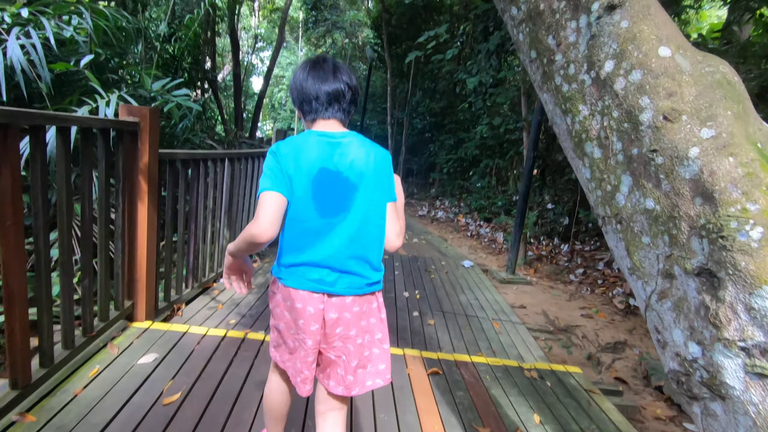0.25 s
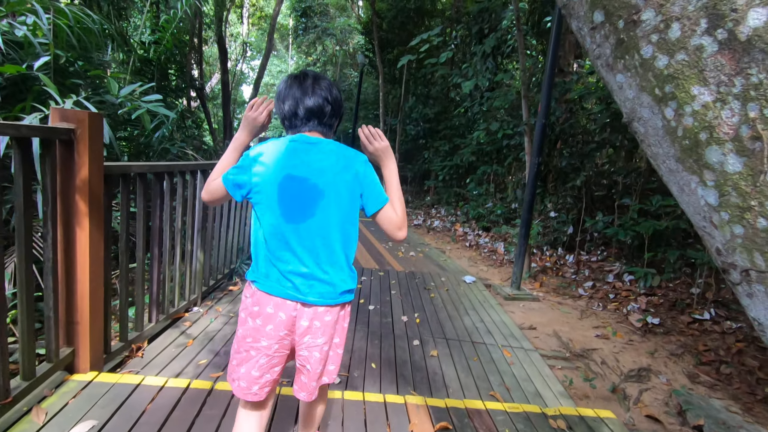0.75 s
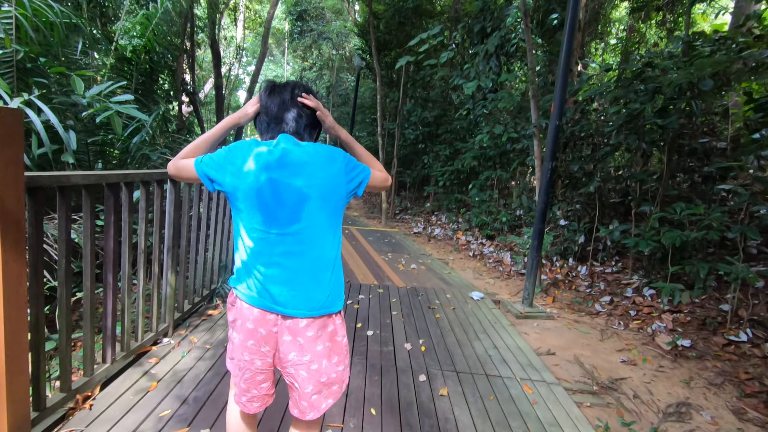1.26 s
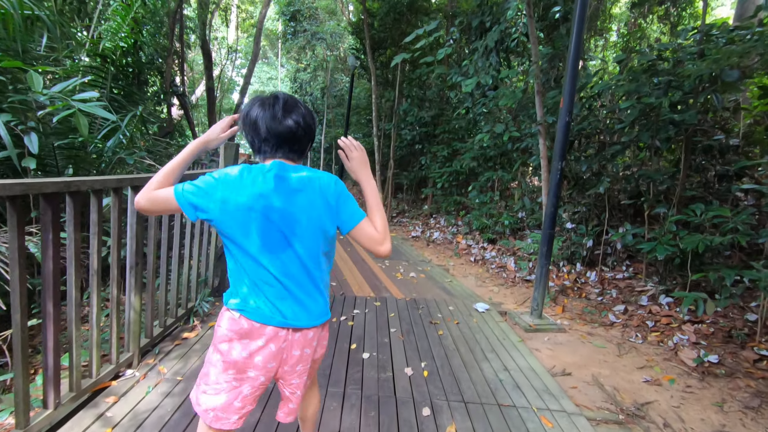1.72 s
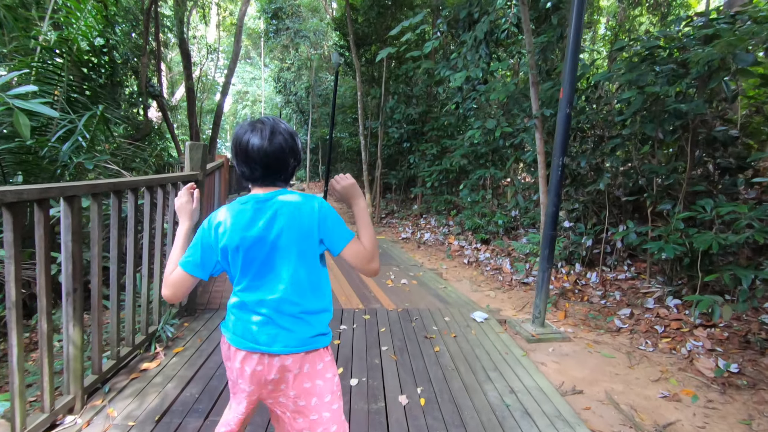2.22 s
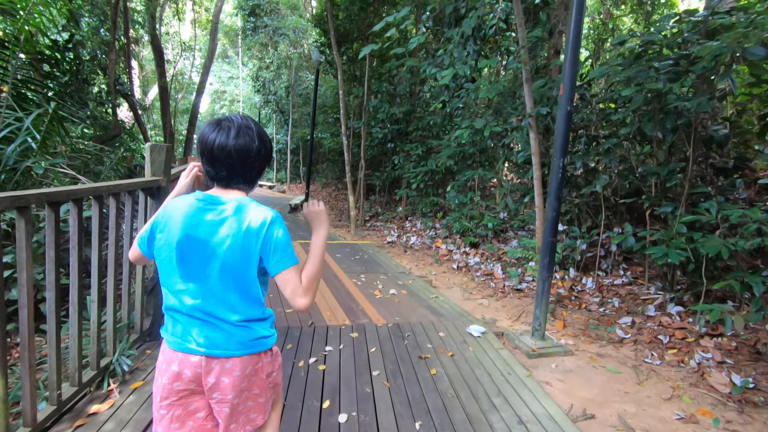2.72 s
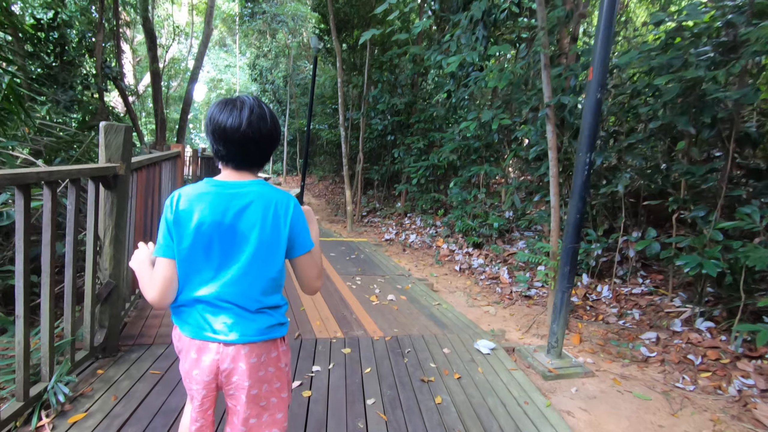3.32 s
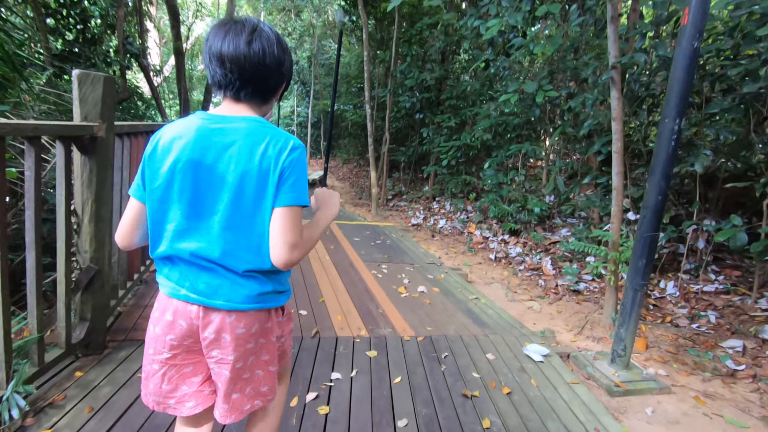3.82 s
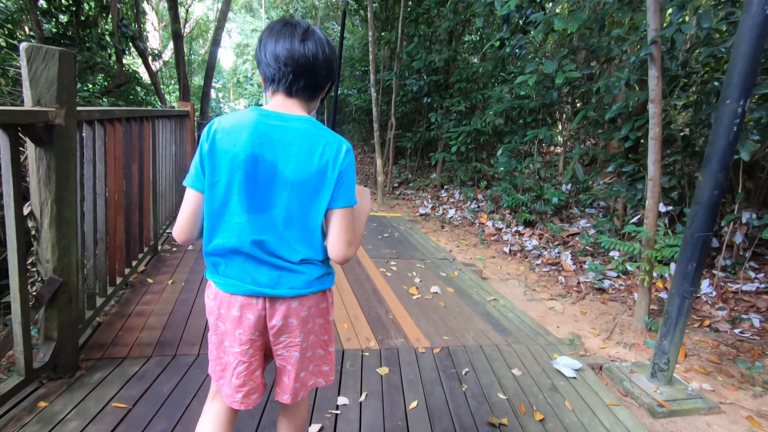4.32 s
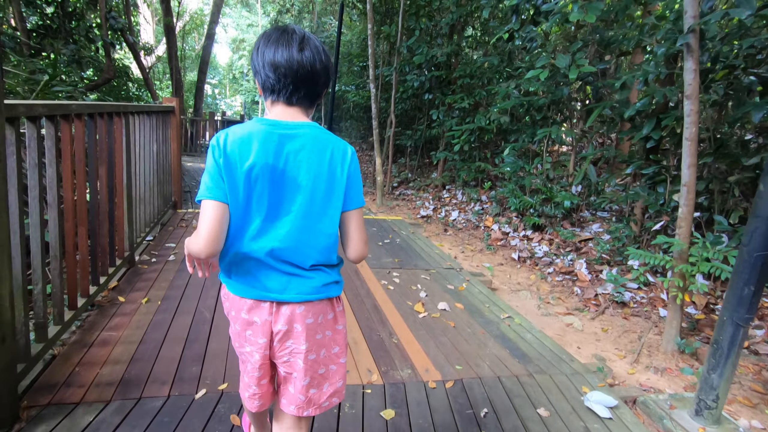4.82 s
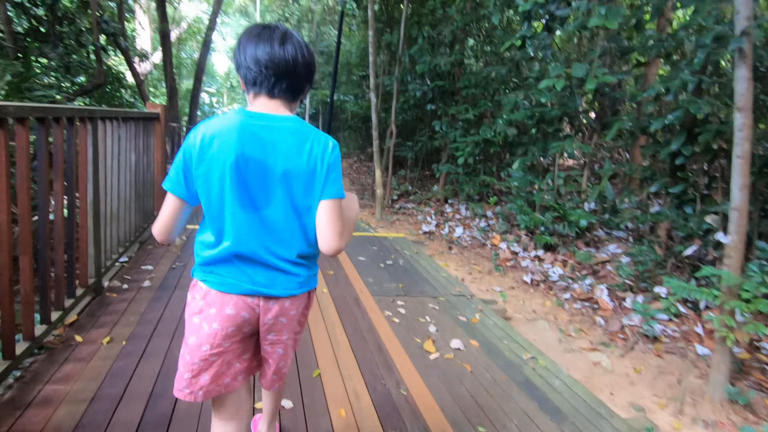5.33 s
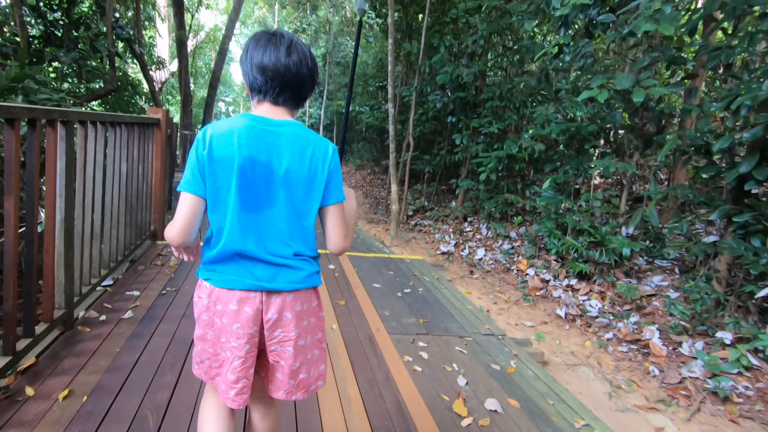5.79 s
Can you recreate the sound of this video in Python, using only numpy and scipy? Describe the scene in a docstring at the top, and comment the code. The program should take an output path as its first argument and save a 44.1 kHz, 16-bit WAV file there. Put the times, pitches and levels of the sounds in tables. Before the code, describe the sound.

Running steps knock rattling wooden boards, soften to lighter slaps, then knock hard again, under a steady piercing insect whine and deep hum.

```python
"""Boardwalk through a tropical forest

Shoes slap on firm boards, as short bursts of filtered noise. Loose planks add fading wood tones: they thud,
ring and clack back, and the deck rumbles on. Grit snaps underfoot, and hard jolts clack close by.
A near cicada, built from sine tones, repeats a falling whine over a noise chorus, a low drone and wind.
A gain control turns the sound down, the treble most of all, while the low knocks are loud."""
import sys
import numpy as np
from scipy import signal
from scipy.fft import rfft, irfft, next_fast_len
from scipy.io import wavfile
from scipy.ndimage import uniform_filter1d

SR = 44100
rng = np.random.default_rng(int(sys.argv[2]) if len(sys.argv) > 2 else 0)


def wav_out(sig):
    """Save sig, one row per channel (or a flat mono array), as 16-bit PCM at SR to the path in sys.argv[1]."""
    wavfile.write(sys.argv[1], SR, np.round(np.clip(np.atleast_2d(sig).T, -1, 1) * 32767).astype(np.int16))


N = 267069
TIME = np.arange(N) / SR
LEAD_S = .03  # room before each blow for the sound to swell
BLOW_TIME = np.arange(16384) / SR - LEAD_S  # seconds, zero at the blow

# loose planks trodden down, then falling back: [t/s, clack level/dB, deck thud level/dB,
# plank ring level/dB, delay of the fall/s, fall relative to tread/dB]
TREADS = [(0.003, -23, -23, -24, 0.026, -3), (0.119, -19, -16, -22, 0.051, 4.5),
          (0.286, -24, -21.5, -23.5, 0.038, 5), (0.406, -30, -28.5, -27.5, 0.035, 6.5),
          (0.455, -17, -24.5, -20.5, 0.048, -5.5), (0.554, -30, -30.5, -20.5, .046, 3),
          (0.619, -34, -36, -18.5, 0.067, -2.5), (5.305, -24, -30, -14.5, 0.027, -2),
          (5.319, -14.5, -13.5, -12, .055, 1.5), (5.545, -20.5, -15.5, -16, .053, 5.5),
          (5.709, -19, -18, -23.5, .036, 1.5), (5.823, -27, -23, -29.5, 0.056, -14.5),
          (5.914, -31, -28, -21.5, 0.04, -3), (6.011, -27.5, -28.5, -28.5, .035, -28)]
# hard jolts close by: [t/s, clack level/dB]
JOLTS = [(3.702, -36.5), (3.716, -25), (3.741, -22.5), (3.789, -27), (3.795, -23), (3.818, -33),
         (3.885, -34)]
# colour of a board's dull body sound: [f/Hz, level/dB]
BOARD_COLOUR = [(60, -16.5), (200, -4), (380, -6), (600, -19), (2000, -54)]
# colour of grit scraped on wood: [f/Hz, level/dB]
GRIT_COLOUR = [(800, -20), (2200, -3), (4700, 0), (6200, -6), (8500, -7), (9800, -22), (15000, -50)]
# colour of low rumble, in the wind and in the deck: [f/Hz, level/dB]
RUMBLE_COLOUR = [(15, -20), (33, -3.5), (72, -5.5), (100, -2.5), (130, -13.5), (180, -17), (300, -21),
                 (1500, -90)]
# colour of the forest's wash, also used for chattering boards: [f/Hz, level/dB]
FOREST_COLOUR = [(100, 8), (185, 16.5), (280, 12), (560, 3.5), (800, -4.5), (1500, -5), (3500, -29.5),
                 (7000, -30.5), (8500, -25), (10000, -28), (14000, -37)]


def gain_of(db):
    """Turns decibels into a factor on the sound wave."""
    return 10 ** (np.asarray(db) / 20)


def evened(x):
    """Scales to an rms of one."""
    return x / np.sqrt(np.mean(x ** 2) + 1e-20)


def read(points, hz):
    """Reads a spectrum in dB at the given frequencies, along a logarithmic frequency scale."""
    f, db = np.transpose(points)
    return np.interp(np.log(hz + 1), np.log(f), db)


def add(mix, s, sound):
    """Mixes a sound in at time s, cutting off what lies outside the scene."""
    start = round(s * SR)
    sound = sound[max(-start, 0):]
    part = mix[max(start, 0):][:len(sound)]
    part += sound[:len(part)]


def wander(rate_hz):
    """Slow random drift with an rms of one: noise with its fast changes filtered away."""
    size = next_fast_len(N)
    hz = np.fft.rfftfreq(size, 1 / SR)
    slow = rfft(rng.standard_normal(size)) * np.exp(-(hz / rate_hz) ** 2)
    return evened(irfft(slow, size)[:N])


def noise(points, patchy_db):
    """Coloured noise whose level drifts in patches of time and frequency."""
    hz = np.fft.rfftfreq(2048, 1 / SR)
    a, b, patches = rng.standard_normal((3, len(hz), N // 512 + 5))
    patches = uniform_filter1d(patches, size=12, axis=0)
    patches = evened(uniform_filter1d(patches, size=4, axis=1))
    level_db = read(points, hz)[:, None] + patchy_db * patches
    z = (a + 1j * b) * gain_of(level_db)
    return evened(signal.istft(z, nperseg=2048, noverlap=1536)[1][:N])


def colour(x, points):
    """Filters with the given spectrum, so that nothing sounds before its cause."""
    size = 2 * len(x)
    log_gain = np.log(gain_of(read(points, abs(np.fft.fftfreq(size, 1 / SR)))))
    response = np.exp(np.conj(signal.hilbert(log_gain)))
    return np.fft.ifft(np.fft.fft(x, size) * response).real[:len(x)]


def sized(x, db, window):
    """Sets the rms level of a sound's loudest window (s)."""
    loudest = uniform_filter1d(x ** 2, max(int(window * SR), 1)).max()
    return x * gain_of(db) / np.sqrt(loudest + 1e-20)


def contact(length, rise, snap, tail_db, tail_t60):
    """A sole brushes the wood, lands with a snap and chatters to rest; the deck scatters the sound."""
    after = np.maximum(BLOW_TIME, 0)
    swell = np.exp(np.minimum(BLOW_TIME, 0) / rise)
    fade = np.exp(-after / max(length, .001)) + gain_of(tail_db - 60 * after / tail_t60)
    # about a quarter of the samples carry a tiny random hit
    hits = rng.standard_normal(len(after)) * (rng.random(len(after)) < .25)
    force = swell * fade * hits
    force /= np.linalg.norm(force)
    force[round(LEAD_S * SR)] += snap
    return force


def woody(x):
    """The boards' short resonances lift several bands, narrow and broad, and weaken one near 1060 Hz."""
    # resonances shared by all boards: [f/Hz, width/Hz, lift/dB]
    resonances = [(556, 77, 5), (700, 53, 2), (792, 8.4, 5.5), (1060, 250, -4), (1616, 69, 4),
                  (2320, 1100, 3)]
    hz = np.fft.rfftfreq(len(x), 1 / SR)
    lift = sum((gain_of(db) - 1) / (1 + 2j * (hz - centre) / width) for centre, width, db in resonances)
    return irfft(rfft(x) * (1 + lift), len(x))


def ring(modes, detune, rise):
    """Wood vibrates at several pitches that swell and die; each blow is tuned a little differently."""
    t = np.maximum(BLOW_TIME, 0)
    tunings = 1 + detune * rng.standard_normal(len(modes))
    waves = 0
    for (hz, db, t60), tuning in zip(modes, tunings):
        waves = waves + gain_of(db - 60 * t / t60) * np.sin(2 * np.pi * hz * tuning * t)
    return waves * (1 - np.exp(-t / rise))


def fading(blows, t60):
    """The level left by blows (s, dB): their energies add up and die away."""
    energy = 0
    for s, db in blows:
        left_db = db - 60 * np.maximum(TIME - s, 0) / t60
        energy = energy + (TIME > s) * gain_of(left_db) ** 2
    return np.sqrt(energy)


def surroundings():
    """Wind rumble and forest wash are drifting noise; the low drone is sine tones that waver."""
    # tones of the drone: [f/Hz, rms level/dB]
    drone_tones = [(36.5, -46), (73, -40), (108.5, -37), (183, -51)]
    wind = gain_of(-36) * noise(RUMBLE_COLOUR, patchy_db=3.5)
    forest = gain_of(-44) * noise(FOREST_COLOUR, patchy_db=5.0)
    drone = 0
    for hz, db in drone_tones:
        strength = gain_of(db) * (1 + 0.061 * wander(4.2))
        turns = np.cumsum(hz + 2.466 * wander(5.75)) / SR
        drone = drone + strength * np.sin(2 * np.pi * turns)
    return wind + forest + np.sqrt(2) * drone


def chorus():
    """Many far cicadas blur into bands of noise at the whine and its overtones."""
    # colour of the chorus: [f/Hz, level/dB]
    chorus_colour = [(2300, -18.5), (2800, -10.5), (3000, 2.5), (3120, 2.5), (3450, -12.5), (4000, -21.5),
                     (5400, -27), (5850, -12.5), (6200, -11), (6700, -27.5), (8400, -27), (8950, -24),
                     (9700, -42)]
    return gain_of(-43.5) * noise(chorus_colour, patchy_db=2.0)


def phrase():
    """Time since the near cicada's phrase began (s), and its swell as a gain."""
    # strength of the phrases, one after another: [level/dB]
    phrase_levels = [-7.5, 0.5, 1, -0.5, -1, -3, -14]
    # swell of one phrase: [t since its start/s, level/dB]
    swell_points = [(0, -14.5), (.36, -15.5), (.48, -2), (.93, -.5), (1, -14)]
    start_s, period_s = .69, .994  # the second phrase starts here; the first is already under way
    number, age = np.divmod(TIME - start_s, period_s)
    db = np.array(phrase_levels)[number.astype(int) + 1] + np.interp(age, *np.transpose(swell_points))
    return age, uniform_filter1d(gain_of(db), size=400)


def sizzle():
    """The chorus's highest band: wide stereo noise that swells with each near phrase."""
    # colour of the sizzle: [f/Hz, level/dB]
    sizzle_colour = [(10000, -41.5), (11200, -35), (11700, -9.5), (12050, -4.5), (12500, -17.5),
                     (13000, -23.5), (13800, -56), (15000, -44), (16000, -61)]
    likeness = 0.25  # of the two ears: 0 unrelated, 1 the same
    right, other = (noise(sizzle_colour, patchy_db=3.5) for _ in range(2))
    left = likeness * right + np.sqrt(1 - likeness ** 2) * other
    swell = 1 + 0.53 * phrase()[1]
    return gain_of(-51) * swell * np.array([left, right])


def near_cicada():
    """A whine that sags through each phrase, with sidebands from the buzzing tymbals (drum skins)."""
    # partials: [multiple of the whine, tymbal sideband number, level before the phrase swell/dB]
    partials = [(1, 0, -46), (2, 0, -44.5), (2, -1, -58), (2, -2, -69), (3, 0, -63), (3, -1, -67),
                (4, 0, -47)]
    whine_hz, sag_hz_per_s, tymbal_hz = 3034, 117, 352
    age, swell = phrase()
    turns = np.cumsum(whine_hz - sag_hz_per_s * age + 2 * wander(90)) / SR
    # a faint twin rises as the top partial falls
    twin_gain = gain_of(-54 + 3 * wander(14))
    out = twin_gain * np.sin(2 * np.pi * (24000 * TIME - 4 * turns))
    for multiple, sideband, db in partials:
        # paths through the leaves fade each partial separately
        flutter = gain_of(1.5 * wander(6)) * np.tanh(abs(1 + .55 * wander(20)))
        tone = np.sin(2 * np.pi * (multiple * turns + sideband * tymbal_hz * TIME))
        out += gain_of(db) * evened(flutter * tone)
    return swell * out


def snaps():
    """Grit and dry leaves crack under a sole: very short, bright bursts."""
    # sharp snaps: [t/s, level/dB]
    snap_times = [(0.087, -31), (2.537, -44), (2.5727, -43), (3.704, -25.5), (5.3177, -25.5),
                  (5.5396, -32.5)]
    # colour of a snap: [f/Hz, level/dB]
    snap_colour = [(1500, -7.5), (5200, -4.5), (7000, -12), (12000, -20), (15500, -44)]
    out = np.zeros(N)
    for s, db in snap_times:
        force = contact(length=0.0014, rise=0.00047, snap=0.24, tail_db=-13, tail_t60=0.14)
        add(out, s - LEAD_S, sized(colour(force, snap_colour), db, window=0.0028))
    return out


def boom_level(s):
    """The boom of a jolt at time s, in dB: each is weaker than the one before."""
    first_db, fall_db_per_s = -17, 97
    return first_db - fall_db_per_s * (s - JOLTS[0][0])


def jolts():
    """Hard clacks that differ between the ears, over a short central boom."""
    # colour of the clack: [f/Hz, level/dB]
    jolt_clack_colour = [(250, 1), (500, 1.5), (900, 6), (1300, -4), (2100, 0), (2800, -16.5), (5000, -21),
                         (9000, -62), (15000, -80)]
    # colour of the boom: [f/Hz, level/dB]
    boom_colour = [(30, -6.5), (115, 6), (170, -8.5), (310, 5.5), (500, -19), (1200, -63)]
    spread = .6  # share of the side sound, added left and subtracted right
    out = np.zeros((2, N))
    for s, clack_db in JOLTS:
        forces = [contact(length=0.0079, rise=0.0015, snap=0.63, tail_db=-18.5, tail_t60=0.38)
                  for _ in range(2)]
        centre, side = (sized(colour(force, jolt_clack_colour), clack_db, window=0.0053)
                        for force in forces)
        boom_force = contact(length=0.072, rise=0.002, snap=0.35, tail_db=-26, tail_t60=0.28)
        boom = sized(colour(boom_force, boom_colour), boom_level(s), window=0.0038)
        for ear, sign in zip(out, (1, -1)):
            add(ear, s - LEAD_S, boom + centre + sign * spread * side)
    return out


def shaken_deck():
    """Heavy blows leave the boardwalk rumbling and its boards chattering, as fading noise."""
    thuds = [(s, thud_db) for s, _, thud_db, *_ in TREADS]
    booms = [(s, boom_level(s)) for s, _ in JOLTS]
    # levels are relative to the thud or boom
    tread_rumble = gain_of(-8) * fading(thuds, t60=1.07)
    jolt_rumble = gain_of(-8) * fading(booms, t60=2.0)
    chatter = gain_of(-17.5) * fading(thuds, t60=0.86)
    rumble_noise = noise(RUMBLE_COLOUR, patchy_db=2.0)
    return (tread_rumble + jolt_rumble) * rumble_noise + chatter * noise(FOREST_COLOUR, patchy_db=6.5)


def knock(clack_db, thud_db, ring_db, rise_s, rattle_s):
    """A loose plank clacks on its joist, rings, and shakes the deck."""
    # the deck on its joists: [f/Hz, level/dB, t60/s]
    deck_modes = [(38, 2, 0.087), (72.6, -37, 0.6), (120.1, 0, 0.1), (160, -16, 0.12)]
    # a single loose plank: [f/Hz, level/dB, t60/s]
    plank_modes = [(200, -17, 0.053), (247.4, 2.5, 0.17), (271.1, 1.5, 0.28), (317.1, -6, 0.41),
                   (354, -8.5, 0.092), (444.7, -10.5, 0.092)]
    # colour of the clack: [f/Hz, level/dB]
    clack_colour = [(150, -11), (420, 2.5), (700, -2), (1050, 1.5), (1400, -14), (2300, -12.5), (3200, -18),
                    (14000, -95)]
    force = contact(rattle_s, rise=rise_s, snap=0.52, tail_db=-15, tail_t60=0.58)
    clack = sized(colour(woody(force), clack_colour), clack_db, window=0.0028)
    body = sized(colour(force, BOARD_COLOUR), clack_db - 3.5, window=0.014)
    grit = sized(colour(force, GRIT_COLOUR), clack_db - 15.5, window=0.0021)
    thud = sized(ring(deck_modes, detune=0.14, rise=0.0019), thud_db, window=.02)
    plank = sized(ring(plank_modes, detune=0.026, rise=0.0051), ring_db, window=0.023)
    return clack + body + grit + thud + plank


def loose_planks():
    """Each loose plank knocks twice: heavily under the foot, then brightly as it falls back."""
    out = np.zeros(N)
    for s, clack_db, thud_db, ring_db, delay, fall_db in TREADS:
        # the foot presses slowly
        tread = knock(clack_db, thud_db, ring_db, rise_s=0.0078, rattle_s=0.0074)
        add(out, s - LEAD_S, tread)
        # the fall is sudden; without the foot the plank chatters longer but moves less wood
        fall = knock(clack_db, thud_db - 15, ring_db - 4, rise_s=0.0036, rattle_s=0.016)
        add(out, s + delay - LEAD_S, gain_of(fall_db) * fall)
    return out


def footsteps():
    """Shoes slap on boards that sit firmly: a woody slap, a gritty scuff and the board's dull body."""
    # shoes on firm boards: [t/s, slap level/dB, grit level/dB]
    steps = [(1.226, -33.5, -49), (1.27, -18.5, -39), (1.715, -40, -46), (1.918, -31, -62),
             (1.95, -16, -39), (1.969, -19, -42), (2.06, -37.5, -44), (2.477, -21, -56),
             (3.067, -36.5, -53), (3.636, -28.5, -64), (4.145, -41.5, -47), (4.725, -38, -44),
             (4.984, -27, -51), (5.456, -26, -44)]
    # colour of the slap: [f/Hz, level/dB]
    slap_colour = [(150, 6), (400, -8.5), (620, 3.5), (1200, 0.5), (1700, -8), (2400, -7.5), (5000, -19.5),
                   (14000, -86)]
    out = np.zeros(N)
    for s, slap_db, grit_db in steps:
        slap_force = contact(length=0.0073, rise=0.0029, snap=0.48, tail_db=-12.5, tail_t60=0.26)
        slap = sized(colour(woody(slap_force), slap_colour), slap_db, window=0.0026)
        scuff_force = contact(length=0.0098, rise=0.0013, snap=0.44, tail_db=-24, tail_t60=.25)
        scuff = sized(colour(scuff_force, GRIT_COLOUR), grit_db, window=0.0034)
        body_force = contact(length=0.03, rise=0.003, snap=0.41, tail_db=-20.0, tail_t60=1.0)
        body = sized(colour(body_force, BOARD_COLOUR), slap_db - 7, window=0.0094)
        add(out, s - LEAD_S, slap + scuff + body)
    return out


def scene():
    """Deck and forest in the centre; the jolts and the sizzle spread between the ears."""
    deck = footsteps() + loose_planks() + shaken_deck() + snaps()
    forest = surroundings() + near_cicada() + chorus()
    return deck + forest + jolts() + sizzle()


def gain_control(x):
    """Loud low knocks slowly turn the sound down, the treble most; it recovers in the pauses."""
    # the deepest cut: [f/Hz, gain/dB]
    deepest_cut = [(100, -1), (1000, -1.5), (3000, -9), (4600, -5), (5900, -11), (7000, -5), (9000, -3.5),
                   (11500, -24.5), (15000, -43)]
    low_hz, high_hz = 200, 420  # the control listens to this band
    threshold_db, knee_db = -31.5, 2.5
    duck_s, recover_s, lag_s = 0.19, 0.44, 0.13
    hz, t, z = signal.stft(x, SR, nperseg=1024, noverlap=768)
    band = (hz > low_hz) & (hz < high_hz)
    level_db = 10 * np.log10((abs(z.mean(0)[band]) ** 2).sum(0) + 1e-12)
    too_loud = .5 + .5 * np.tanh((level_db - threshold_db) / knee_db)
    held = duck = 0.39  # already partly turned down at the start
    depth = []
    for over in too_loud:
        held += (over - held) * t[1] / (duck_s if over > held else recover_s)
        duck += (held - duck) * t[1] / lag_s
        depth.append(duck)
    z = z * gain_of(np.outer(read(deepest_cut, hz), depth))
    return signal.istft(z, SR, nperseg=1024, noverlap=768)[1][:, :N]


def record(dry):
    """Gain control, then a low cut, a treble that leans right, and a steep upper band limit."""
    hz = np.fft.rfftfreq(N, 1 / SR)
    lean_db = -5 * np.interp(hz, [8500, 11500], [0, 1])  # left relative to right
    low_cut = hz / np.hypot(hz, 12)
    ear_gains = gain_of(np.array([lean_db, -lean_db]) / 2)
    leaning = irfft(rfft(gain_control(dry)) * low_cut * ear_gains, N)
    band_limit = signal.firwin(511, 15600, window=("kaiser", 9), fs=SR)
    return signal.oaconvolve(leaning, band_limit[None], "same")


dry = scene()
out = record(dry)
wav_out(out)
```